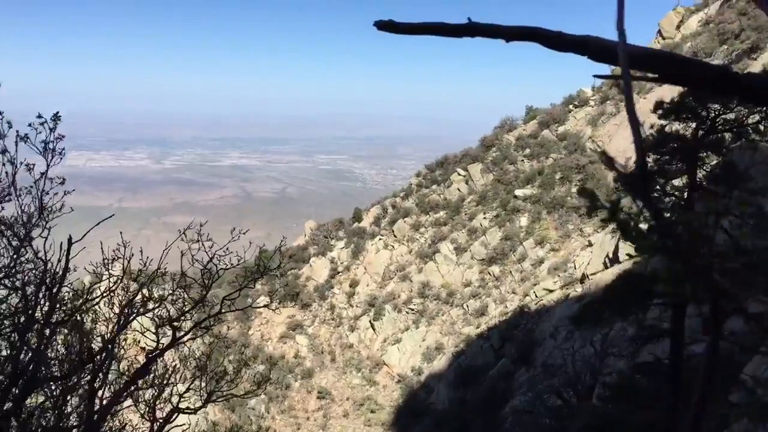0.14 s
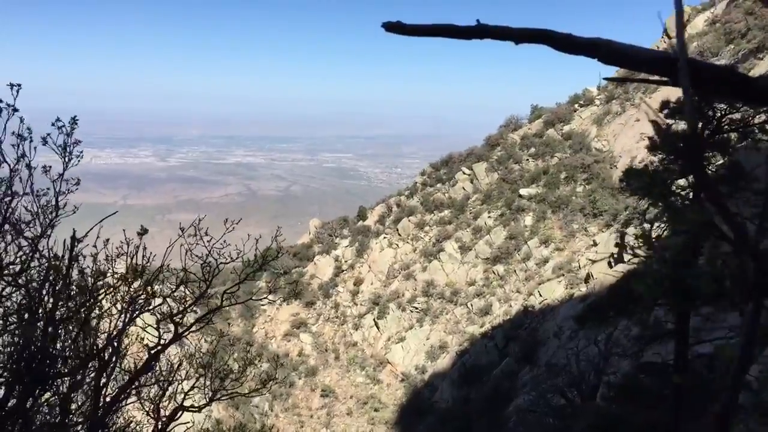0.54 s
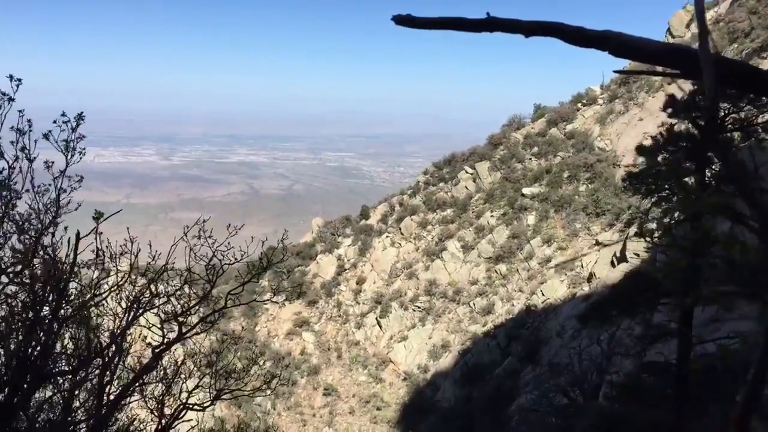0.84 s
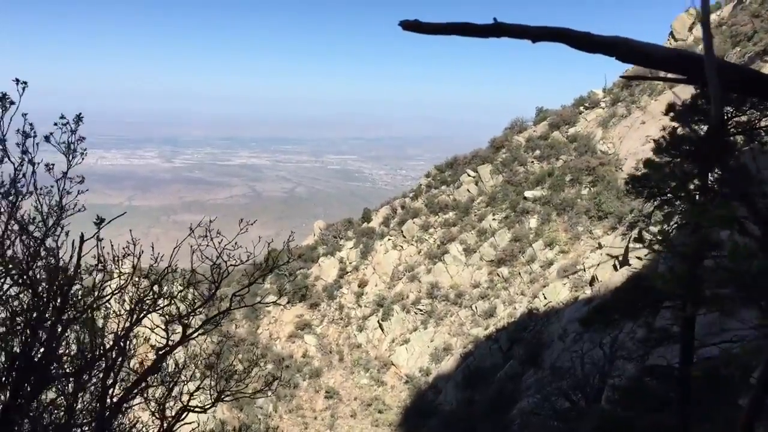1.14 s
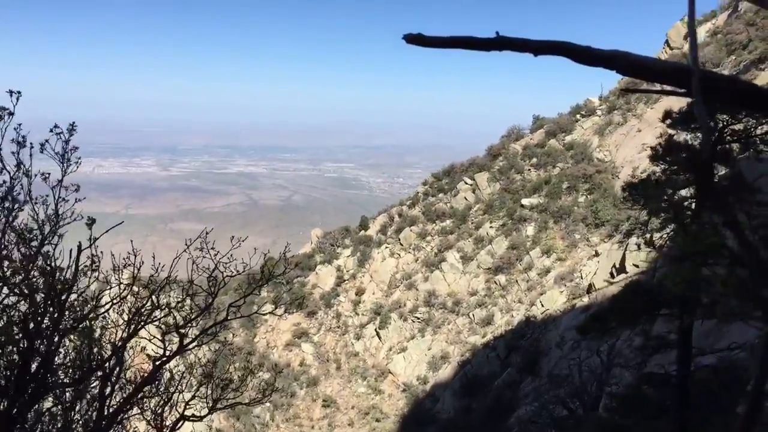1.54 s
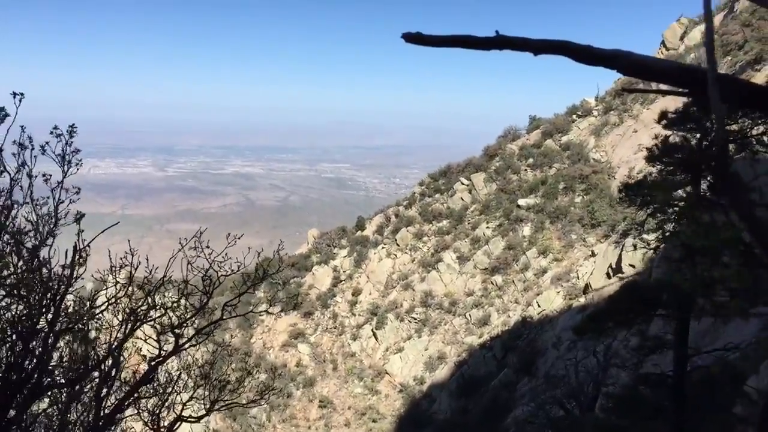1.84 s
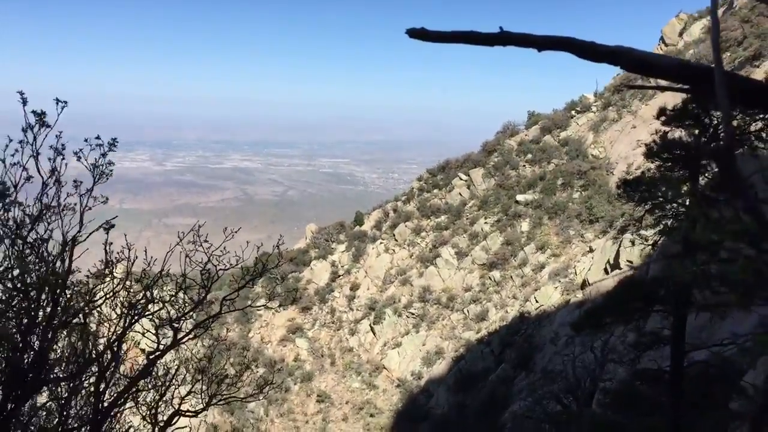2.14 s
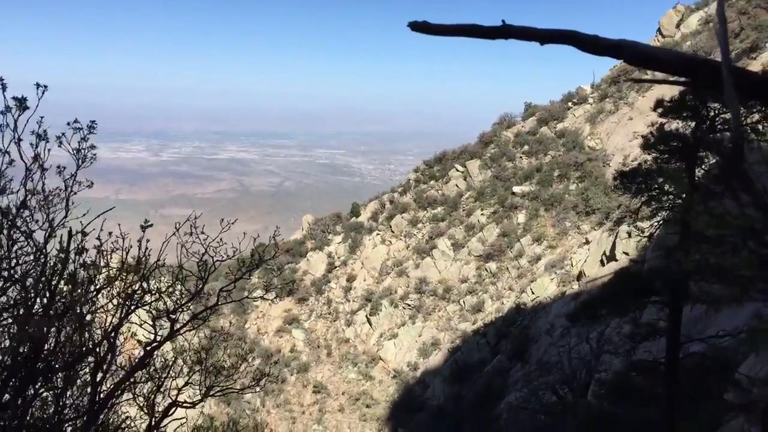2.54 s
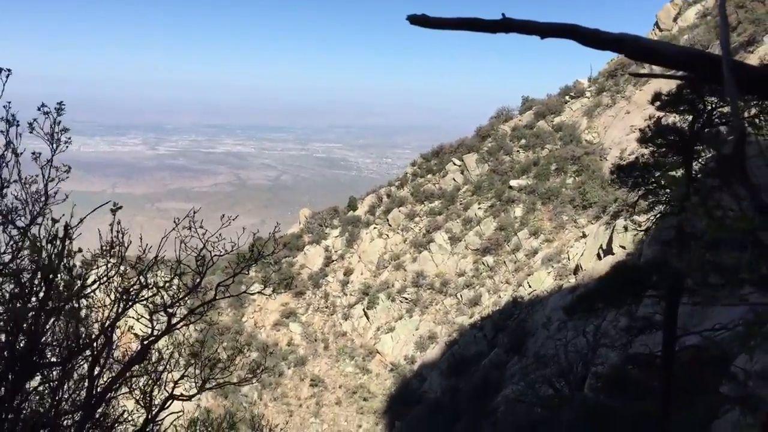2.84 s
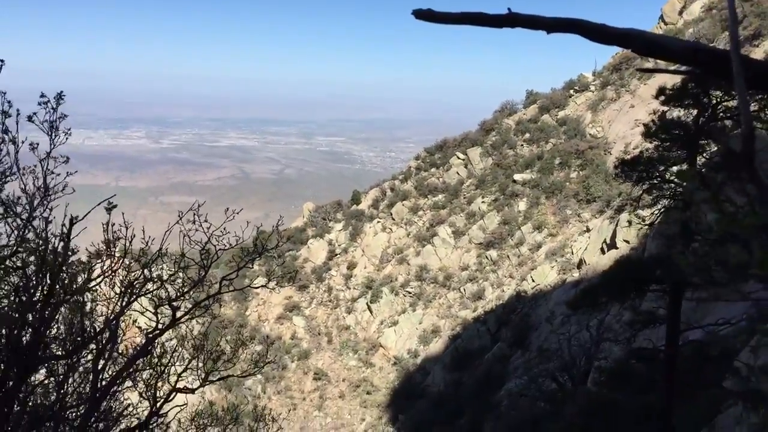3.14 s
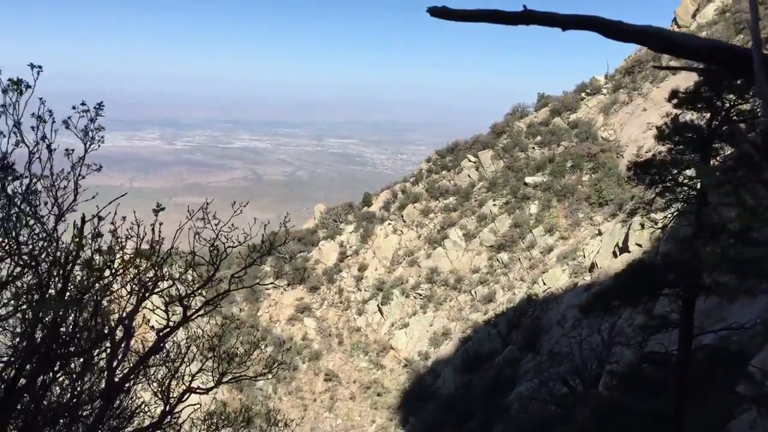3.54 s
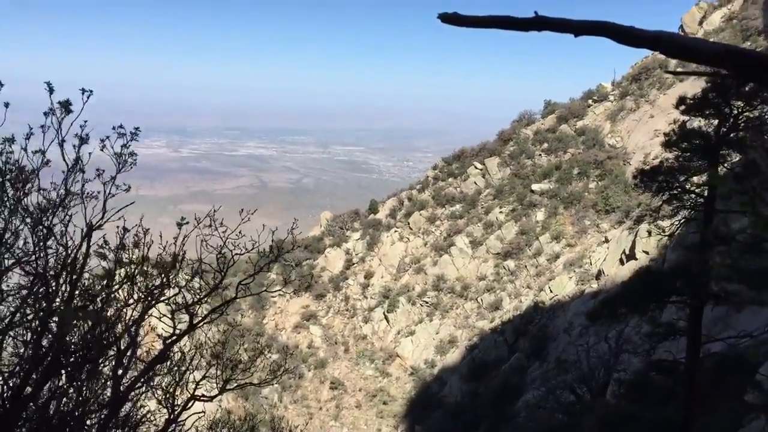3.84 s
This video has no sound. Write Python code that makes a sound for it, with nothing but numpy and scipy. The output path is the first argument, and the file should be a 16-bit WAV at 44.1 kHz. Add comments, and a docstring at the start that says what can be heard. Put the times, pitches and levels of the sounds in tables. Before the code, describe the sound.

Wind buffets a small microphone on an open, brushy hillside. Low fluttering puffs start at once, swelling into a hard gust with sharp slaps around 0.4-0.85 s, strongest near 0.7 s. Afterwards come uneven, softer rumbles, with bumps near 1.0, 1.56, 1.78 and 2.8 s. A distant tree hush slowly calms. Very faint leaf brushes and dry twig ticks appear around 0.45, 0.65, 2.0-2.6 and 3.7 s.

```python
"""Wind on an open hillside

Far trees hush and slowly calm: shaped noise with drifting patches. Nearby leaves brush and twigs squeak:
short strokes of noise. Dry twigs tick: a ringing noise with a wider snap.
In front, wind buffets a small microphone in uneven puffs, with one hard gust early on: noise read
at a changing speed stands for the passing eddies, and sharp pressure spikes for those that slap."""
import sys
import numpy as np
from scipy import signal
from scipy.fft import rfft, irfft
from scipy.io import wavfile
from scipy.ndimage import uniform_filter1d, map_coordinates

SR = 44100
rng = np.random.default_rng(int(sys.argv[2]) if len(sys.argv) > 2 else 0)


def generate_wav(signal):
    """Clip the signal to [-1, 1] and save it as 16-bit WAV at the path in sys.argv[1]."""
    frames = np.transpose(np.atleast_2d(signal))
    scaled = np.clip(frames, -1, 1) * 32767
    pcm = np.round(scaled).astype(np.int16)
    wavfile.write(sys.argv[1], SR, pcm)


N = 176400  # length of the scene [samples], four seconds

# tone of the far trees: (frequency [Hz], relative strength per Hz [dB])
HUSH_SPECTRUM = [(20, -26.5), (70, 7.5), (300, 5), (600, 0), (1000, -1.5), (1500, -8), (2300, -14),
                 (3300, -22), (4800, -29), (6200, -32), (9000, -36.5), (16000, -39.5)]
# loudness of the far trees: (time [s], level [dB])
HUSH_LEVEL = [(0, -44), (.35, -43), (0.849, -45.5), (1.05, -45), (1.6, -48), (2.02, -46), (2.3, -48),
              (2.551, -48.5), (2.852, -52), (3.2, -52), (3.45, -49), (3.681, -50.5), (4, -51.5)]
HUSH_PATCH_DB = 2  # how far patches of the hush stray in level

# strokes of brushing leaves: (middle [s], length [s], level at the middle [dB], tilt above 1500 Hz [dB/octave])
BRUSHES = [(0.461, .028, -61, 18), (.492, 0.018, -53, 17.5), (1.684, .039, -58.5, -3.5),
           (2.01, 0.23, -55, -10), (2.033, 0.054, -63, -2), (2.209, 0.022, -58.5, 3),
           (2.495, .06, -59, 0.5), (2.541, 0.039, -51.5, 3), (3.693, 0.052, -54, -8), (3.675, .09, -76, 17),
           (3.82, .06, -66, 6)]
# tone of the leaves before tilting: (frequency [Hz], relative strength per Hz [dB])
LEAF_SPECTRUM = [(1200, 9.5), (2100, 6.5), (2760, 7.5), (3050, 1.5), (3800, 0.5), (4850, -3.5), (5230, 0),
                 (5600, -5.5), (6150, 4), (7000, -11), (9000, -10.5), (10500, -29.5), (11700, -19),
                 (13300, -24), (16000, -35)]
BRUSH_GRAIN, BRUSH_GRAIN_HZ = 0.41, 198  # depth and rate of the roughness in a stroke
# squeaks of rubbing twigs: (middle [s], length [s], level at the middle [dB])
SQUEAKS = [(1.686, .04, -72), (3.824, 0.039, -61.5)]
# resonances of a squeak: (frequency [Hz], width [Hz], relative strength [dB])
SQUEAK_MODES = [(4090, 120, 2), (6120, 240, 6)]
UNEVEN_DB, UNEVEN_HZ = 4.5, 477  # depth and width of the resonances of leaves and twigs

# ticks of dry twigs: (start [s], level [dB], ring frequency [Hz], snap compared with ring [dB])
TICKS = [(.425, -51.5, 5700, -5), (.432, -46.5, 5660, -6), (.448, -53, 12400, 4), (.453, -61, 5600, 9),
         (.481, -53, 10900, -2), (.635, -49.5, 6550, -2.5), (.672, -61, 5400, 7), (.684, -51.5, 7000, 3.5),
         (.695, -58, 7200, 6.5), (1.566, -66, 9700, -11), (1.648, -64, 11770, 1), (1.661, -64, 11900, -2),
         (2.022, -57.5, 4200, 5), (2.026, -51, 15000, -0.5), (2.205, -55, 4200, 1), (2.21, -60, 14900, -10),
         (2.242, -59, 7900, -5), (2.321, -58.5, 6250, -11), (2.376, -63, 4000, -3),
         (2.397, -59.5, 7900, -5), (2.471, -56, 2600, -6), (2.547, -50, 3670, -13), (2.584, -60, 7100, -11),
         (2.752, -68, 14500, 4.5), (2.758, -63, 3860, 3), (2.778, -66, 3780, -6), (3.636, -68, 11600, 1),
         (3.662, -57.5, 3850, -1), (3.671, -62, 11800, -1)]
# tone of a snap: (frequency [Hz], relative strength per Hz [dB])
SNAP_SPECTRUM = [(1500, -6), (3500, -9), (6000, -2.5), (9000, -4.5), (16000, -6)]
TICK_RING_S, TICK_WIDTH_HZ = 0.0011, 570  # time to the ring's peak and its fading time; width of its resonance
TICK_TAIL_S, TICK_TAIL_DB = 0.012, -19  # fading time and level of the tail
CRACKLE_PER_S, CRACKLE_DB, CRACKLE_SPREAD_DB = 41, -80.5, 17  # rate, overall level and spread of tiny ticks

# puffs on the microphone: (middle [s], length [s], level at full push [dB], eddy rate at full push [Hz])
PUFFS = [(0.027, 0.072, -22.5, 234.4), (0.086, .055, -22, 313.8), (0.131, 0.024, -21, 238),
         (0.163, .04, -24.5, 252), (0.222, 0.066, -25.5, 232.3), (0.307, 0.12, -29, 175.6),
         (0.407, 0.029, -22.5, 170), (.458, .06, -19, 162.5), (0.542, .062, -19, 177.3),
         (.588, 0.037, -19.5, 370), (0.615, 0.031, -14.5, 170), (0.629, 0.031, -14.5, 462),
         (0.662, 0.021, -11, 257), (0.703, .028, -16.5, 481.4), (.738, 0.044, -17.5, 447),
         (.72, .06, -19, 167.5), (0.807, .03, -19.5, 181.5), (1.001, 0.037, -17, 60.5),
         (1.068, 0.065, -24.5, 127.8), (1.174, .066, -26.5, 117.7), (1.246, 0.027, -24.5, 129.4),
         (1.497, 0.14, -27, 119.3), (1.579, 0.049, -26, 150), (1.732, .05, -27, 128),
         (1.775, 0.041, -20.5, 237.3), (1.815, 0.025, -29, 97.5), (1.96, 0.018, -26.5, 219),
         (2.017, 0.082, -24.5, 137.4), (2.125, 0.025, -30, 137.5), (2.232, .041, -26, 161.3),
         (2.328, 0.042, -31.5, 109), (2.519, .18, -32, 130.7), (2.656, .09, -26.5, 150.3),
         (2.742, .04, -28, 75.3), (2.797, .04, -21.5, 165.5), (2.819, 0.027, -21, 76),
         (2.952, 0.067, -27, 99), (3.038, 0.08, -26.5, 127.6), (3.132, 0.043, -28, 58.7),
         (3.259, 0.1, -23, 138.2), (3.517, 0.08, -24.5, 140.2), (3.62, .13, -32, 88),
         (3.758, 0.073, -25, 144.2), (3.823, .061, -24.5, 171.2), (3.888, 0.089, -29.5, 129.7),
         (3.955, 0.038, -23.5, 167)]
# tone of the eddies: (frequency [multiples of the eddy rate], relative strength [dB])
EDDY_SPECTRUM = [(.1, -18.5), (.3, -1), (.6, -1.5), (1, -5), (1.8, -21), (3, -37.5), (5, -60.5), (10, -94),
                 (30, -120)]
PUFF_EDGE = 2.8  # squareness of a swell, for puffs and strokes alike
CHURN, CHURN_HZ = 0.15, 106.6  # depth and rate of the wavering air speed
RATE_FOLLOWS = 0.2  # power by which eddies quicken with the push
EDDY_EVENNESS = 0.79  # how alike in strength the eddies of a puff are, 0-1
DRAUGHT_DB, DRAUGHT_HZ = -39, 92.1  # level and eddy rate of the light air between the puffs
MIC_LOW_HZ = 57.8  # the microphone loses puff and draught sound below this
# single eddies that slap the port: (middle [s], peak before bass cut [dB], time scale of the spike [s])
SLAPS = [(.117, -11.5, 0.00061), (0.393, -12.5, 0.00067), (.573, -8, 0.00044), (.594, -8.5, 0.00032),
         (.626, -12, 0.0002), (0.657, -2.5, 0.00033), (0.694, -2, 0.00029), (0.748, -8, 0.00032),
         (.816, -9, 0.00096), (1.248, -16, 0.0016), (1.5589, -6, 0.00071), (1.776, -9, 0.00075),
         (2.794, -18, 0.00042)]
SLAP_LOW_HZ = 111  # bass cut that makes a slap swing back

EDGE_HZ = 15900  # upper limit of the recorder


def amp(db):
    """Turns decibels into a gain."""
    return 10 ** (np.asarray(db) / 20)


def unit(x):
    """Scales a signal to an average strength (rms) of 1."""
    return x / np.sqrt(np.mean(x ** 2) + 1e-30)


def read(points, f):
    """Reads a table of strengths in dB, joining its points on a log-frequency axis."""
    at, db = np.transpose(points)
    return np.interp(np.log(f + 1), np.log(at), db)


def add(mix, start, sound):
    """Mixes in a sound from a start time in seconds, trimming what falls outside."""
    at = int(round(start * SR))
    sound = sound[max(-at, 0):]
    part = mix[max(at, 0):][:len(sound)]
    part += sound[:len(part)]


def add_centred(mix, middle, sound):
    """Mixes in a sound around a middle time in seconds."""
    add(mix, middle - len(sound) / SR / 2, sound)


def noise(shape, size):
    """Makes noise of rms 1, with shape(Hz) setting the strength of each frequency."""
    spectrum = rfft(rng.standard_normal(size))
    return unit(irfft(spectrum * shape(np.fft.rfftfreq(size, 1 / SR)), size))


def waver(hz, size):
    """Makes a smooth random drift, mostly slower than the given rate."""
    return noise(lambda f: 1 / (1 + (f / hz) ** 2) ** 2, size)


def peak(f, hz, width):
    """Gives the strength of one resonance at each frequency."""
    return 1 / (1 + (2 * (f - hz) / width) ** 2)


def uneven(f):
    """Gives a leaf or twig its own chance resonances: random gains smoothed over frequency."""
    bins = int(UNEVEN_HZ / f[1]) + 1
    return amp(UNEVEN_DB * unit(uniform_filter1d(rng.standard_normal(len(f)), bins)))


def swell(length, size):
    """Makes a rounded rise and fall, reaching 1 in the middle of a buffer."""
    t = (np.arange(size) - size / 2) / SR
    return np.exp(-abs(2 * t / length) ** PUFF_EDGE / 2)


def far_trees():
    """Shaped noise makes a soft hush; small patches of time and pitch drift in level."""
    steady = noise(lambda f: amp(read(HUSH_SPECTRUM, f)), N)
    z = signal.stft(steady, SR, nperseg=1024, noverlap=768)[2]
    patches = uniform_filter1d(rng.standard_normal(z.shape), size=14, axis=0)  # smooth over pitch
    patches = unit(uniform_filter1d(patches, size=5, axis=1))  # smooth over time
    z = z * amp(HUSH_PATCH_DB * patches)
    hush = unit(signal.istft(z, SR, nperseg=1024, noverlap=768)[1][:N])
    return hush * amp(np.interp(np.arange(N) / SR, *np.transpose(HUSH_LEVEL)))


def leaf_brush(length, tilt):
    """Leaves brush past: resonant noise with a rough grain, swelling and fading."""
    def tone(f):
        tilt_db = tilt * np.log2(np.maximum(f, 1500) / 1500)
        bass_cut = f / (f + 1000)
        return amp(read(LEAF_SPECTRUM, f) + tilt_db) * bass_cut * uneven(f)

    stroke = swell(length, size=8192)
    rub = noise(tone, len(stroke))
    grain = np.exp(BRUSH_GRAIN * waver(BRUSH_GRAIN_HZ, len(stroke)))
    return stroke * unit(rub * grain)


def twig_squeak(length):
    """Twigs slide with a thin squeak: noise gathered at a few narrow resonances."""
    def tone(f):
        return sum(amp(db) * peak(f, hz, width) for hz, width, db in SQUEAK_MODES)

    stroke = swell(length, size=8192)
    return stroke * noise(tone, len(stroke))


def rubbing():
    """Places the strokes of leaves and the squeaks of twigs in time."""
    out = np.zeros(N)
    for middle, length, db, tilt in BRUSHES:
        add_centred(out, middle, amp(db) * leaf_brush(length, tilt))
    for middle, length, db in SQUEAKS:
        add_centred(out, middle, amp(db) * twig_squeak(length))
    return out


def tick(hz, snap_db):
    """A dry twig gives a wide snap and a narrow ring, both short with a faint tail."""
    ring = noise(lambda f: peak(f, hz, TICK_WIDTH_HZ), size=2048)
    snap = noise(lambda f: amp(read(SNAP_SPECTRUM, f)) * uneven(f), size=2048)
    t = np.arange(len(ring)) / SR
    burst = t / TICK_RING_S * np.exp(1 - t / TICK_RING_S)
    tail = np.exp(-t / TICK_TAIL_S) * (1 - np.exp(-t / TICK_RING_S))
    fade = burst + amp(TICK_TAIL_DB) * tail
    both = unit(ring * fade) + amp(snap_db) * unit(snap * fade)
    return both * np.sqrt(np.mean(fade ** 2))


def twigs():
    """Twigs give clear ticks at set times, among tiny ones scattered by chance."""
    clear, tiny = np.zeros(N), np.zeros(N)
    for start, db, hz, snap_db in TICKS:
        add(clear, start, amp(db) * tick(hz, snap_db))
    count = int(CRACKLE_PER_S * N / SR)
    for when, size, pitch in rng.random((count, 3)):
        level = amp(CRACKLE_SPREAD_DB * size ** 2)  # squaring makes loud ones rarer
        add(tiny, when * N / SR, level * tick(4000 + 10000 * pitch, 1.5))
    return clear + amp(CRACKLE_DB) * unit(tiny)


def eddies(push, hz):
    """Turbulence sweeps past the port: faster air is louder and brighter; the microphone sheds deep bass."""
    base_hz = 700  # eddy rate of the noise before its reading speed is changed
    field = noise(lambda f: amp(read(np.array(EDDY_SPECTRUM) * [base_hz, 1], f)), len(push))
    strength = uniform_filter1d(field ** 2, size=90, mode="wrap")
    strength = uniform_filter1d(strength, size=90, mode="wrap")
    field = field / strength ** (EDDY_EVENNESS / 2)
    speed = np.exp(CHURN * waver(CHURN_HZ, len(push)))
    # how far the air has moved along the noise [samples]
    travel = np.cumsum(speed * push ** RATE_FOLLOWS) * hz / base_hz
    passing = map_coordinates(field, [travel], order=3, mode="grid-wrap")
    pressure = push * speed * passing
    low_cut = signal.butter(5, MIC_LOW_HZ, "high", fs=SR, output="sos")
    return unit(signal.sosfilt(low_cut, pressure)) * np.sqrt(np.mean(push ** 2))


def slap(width):
    """One eddy hits the port squarely: a pressure spike that swings back after a bass cut."""
    t = (np.arange(2048) - 1024) / SR
    spike = 1 / np.cosh(t / width)
    return signal.lfilter(*signal.butter(2, SLAP_LOW_HZ, "high", fs=SR), spike)


def buffeting():
    """Wind presses on the microphone: puffs and slaps over a light, steady draught."""
    out = amp(DRAUGHT_DB) * eddies(np.ones(N), DRAUGHT_HZ)
    for middle, length, db, hz in PUFFS:
        push = swell(length, size=20000)
        add_centred(out, middle, amp(db) * eddies(push, hz))
    for middle, db, width in SLAPS:
        add_centred(out, middle, amp(db) * slap(width))
    return out


def scene():
    """Adds far trees, near leaves and twigs, and wind on the microphone into one channel."""
    return (far_trees() + rubbing() + twigs() + buffeting())[None]


def record(dry):
    """The recorder's band limit removes the highest treble."""
    band_limit = signal.firwin(511, EDGE_HZ, window=("kaiser", 9), fs=SR)
    return signal.oaconvolve(dry, band_limit[None], "same")


dry = scene()
out = record(dry)
generate_wav(out)
```